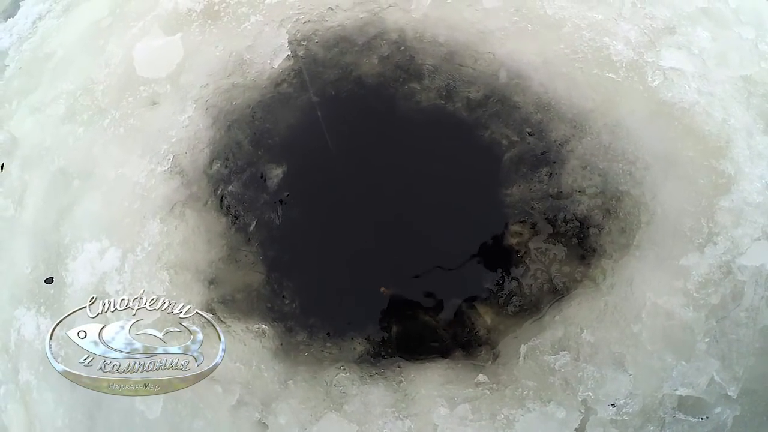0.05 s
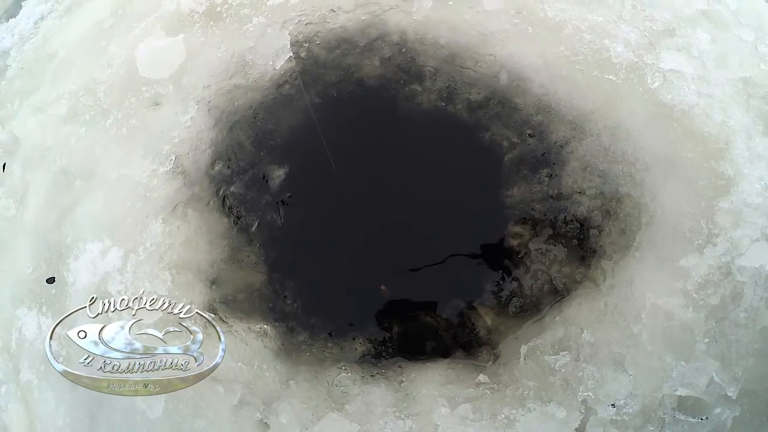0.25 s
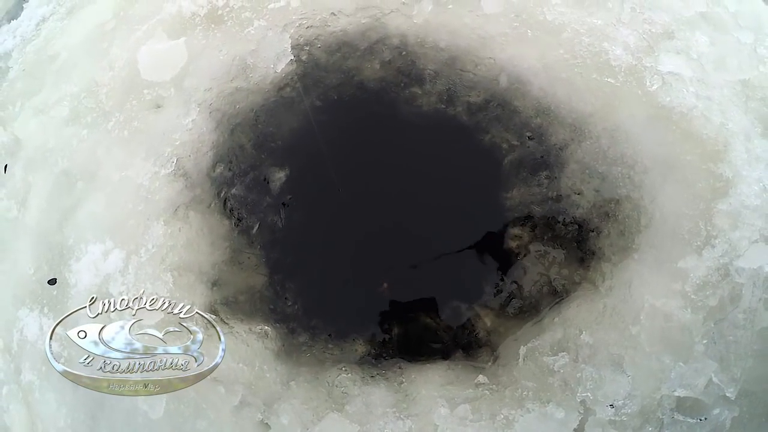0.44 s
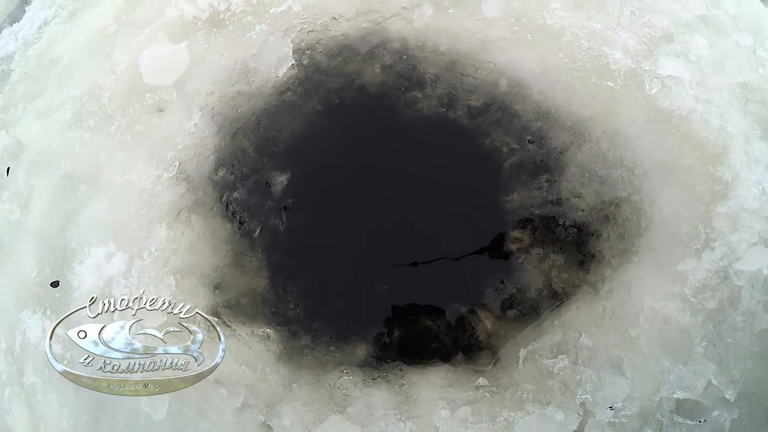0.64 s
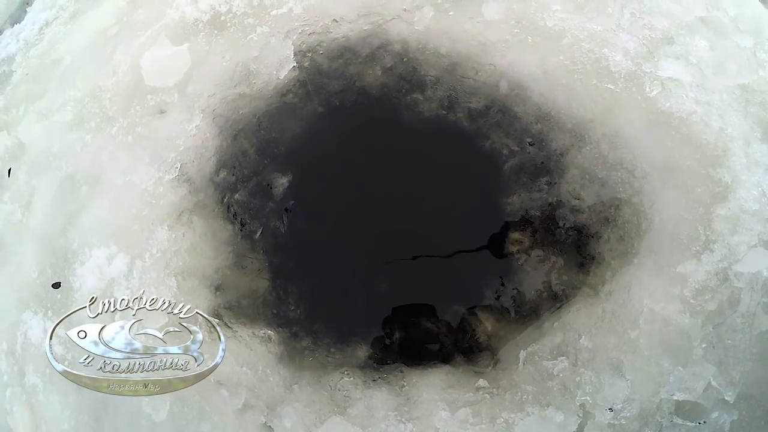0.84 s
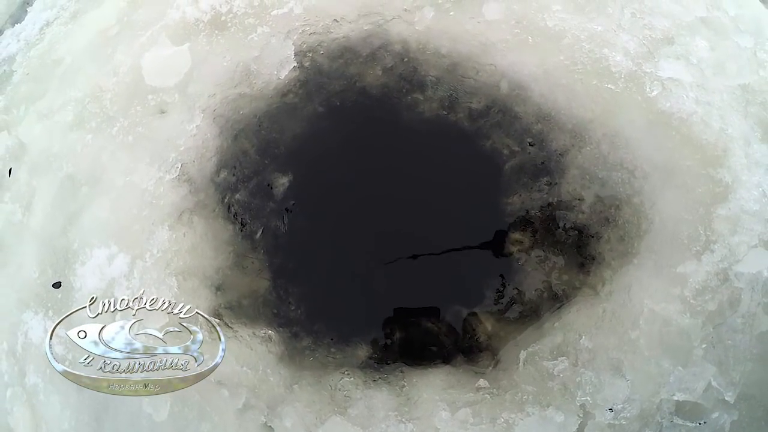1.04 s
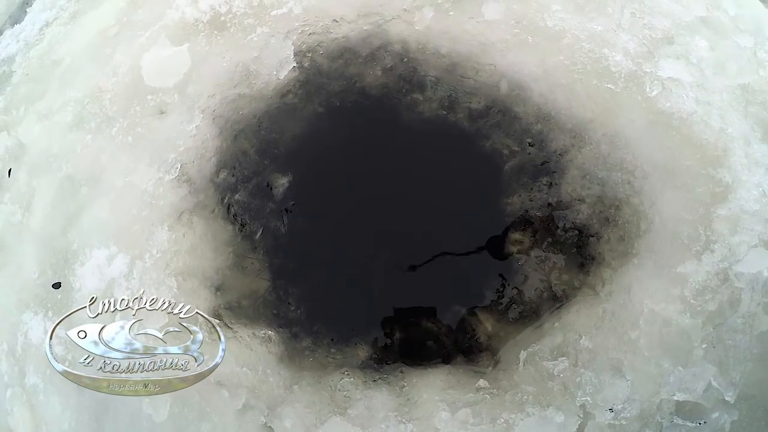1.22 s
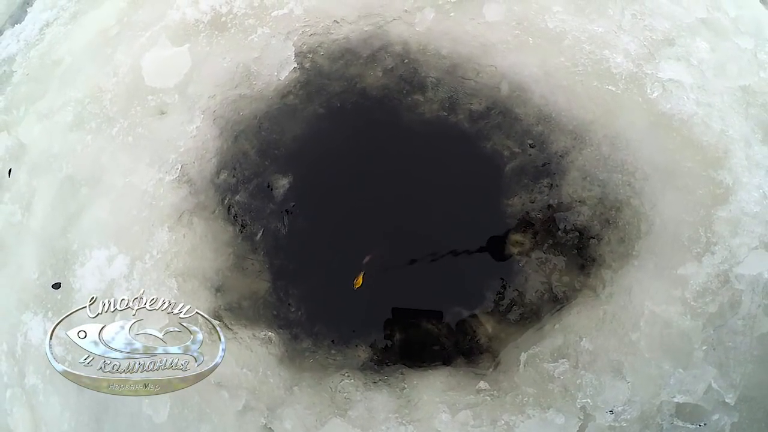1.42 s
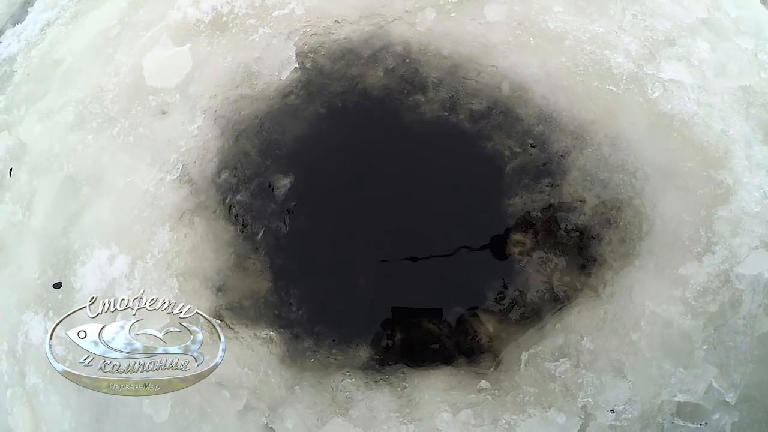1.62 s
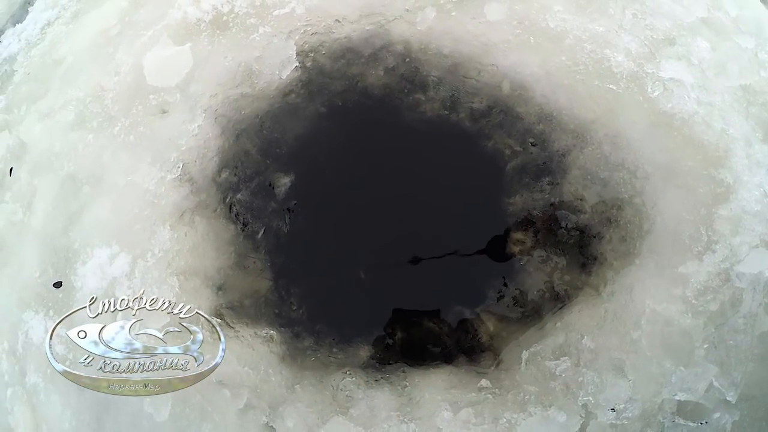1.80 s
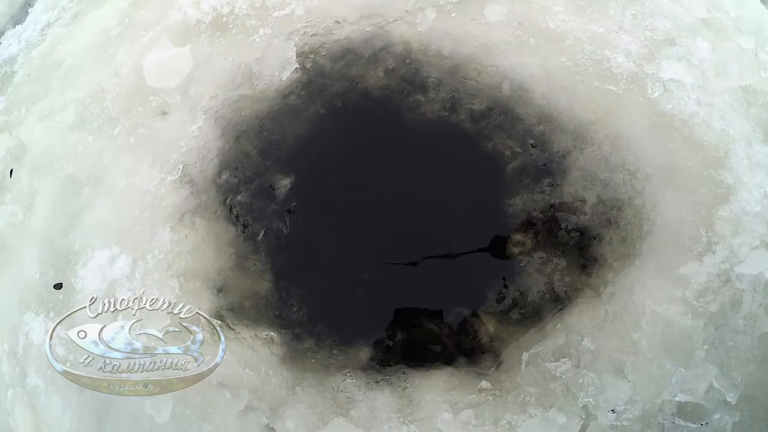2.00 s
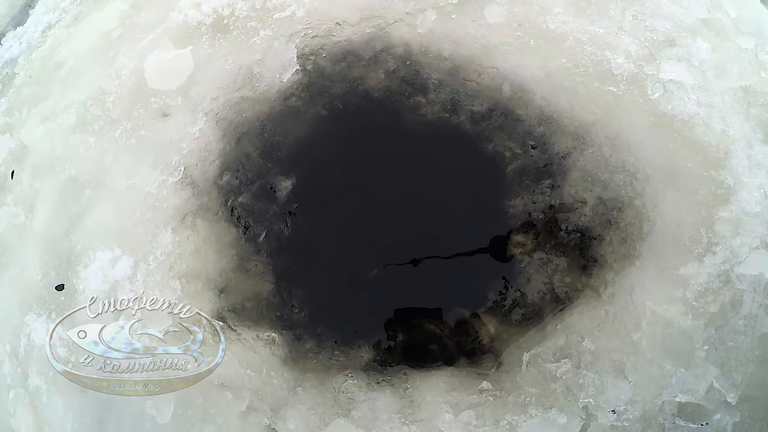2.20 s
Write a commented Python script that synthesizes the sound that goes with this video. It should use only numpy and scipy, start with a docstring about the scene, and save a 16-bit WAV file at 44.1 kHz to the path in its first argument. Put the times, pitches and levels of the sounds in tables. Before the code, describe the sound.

Dull, hollow knocks of gear handled on ice come in two bunches, each trailed by lighter bumps. Between them a small hard part clicks and rattles. Scuffing and low wind rumble run underneath, outdoors and right at the microphone.

```python
"""On the ice beside a fishing hole, gear is handled right next to a camera's microphone. Two bunches of
dull, hollow knocks, with lighter bumps after them, sound over scuffing and a low rumble of wind and
handling. Crumbs of ice crunch under the knocks. Between the bunches a small hard part clicks and
rattles, and a sleeve brushes by. Faint chirps and a whirr sit behind it all. Open air, nearly mono."""
import sys
import numpy as np
from scipy import signal
from scipy.fft import rfft, irfft, next_fast_len
from scipy.io import wavfile
from scipy.ndimage import map_coordinates

SR = 44100
rng = np.random.default_rng(int(sys.argv[2]) if len(sys.argv) > 2 else 0)


def store_pcm(level_fs):
    """Save levels as 16-bit WAV."""
    pcm = np.round(np.clip(level_fs, -1, 1) * 32767).astype(np.int16)
    wavfile.write(sys.argv[1], SR, np.atleast_2d(pcm).T)


N = 103635


def amp(db):
    """Turn decibels into a number to multiply by."""
    return 10 ** (np.asarray(db) / 20)


def unit(x):
    """Scale a sound so that its average (rms) level is 1."""
    return x / np.sqrt(np.mean(x ** 2) + 1e-20)


def gain(points, hz):
    """Read a smooth tone curve of (frequency [Hz], level [dB]) points as multipliers."""
    point_hz, db = np.transpose(points)
    return amp(np.interp(np.log(hz + 1), np.log(point_hz + 1), db))


def filtered(x, response):
    """Turn each frequency of a sound up or down by response(hz)."""
    size = next_fast_len(N + 8192)
    hz = np.fft.rfftfreq(size, 1 / SR)
    return irfft(rfft(x, size) * response(hz), size)[..., :N]


def noise(tone):
    """Noise shaped by a tone curve, at an average level of 1."""
    return unit(filtered(rng.standard_normal(N), lambda hz: gain(tone, hz)))


def wobble(rate):
    """A smooth curve through `rate` random values a second."""
    return map_coordinates(rng.standard_normal(int(N * rate / SR) + 4), [np.arange(N) * rate / SR])


def grainy_noise(tone, flicker_db, rate):
    """Noise whose level flickers, so that it sounds rough."""
    return unit(noise(tone) * amp(flicker_db * wobble(rate)))


def curve(rows):
    """Join (time [s], value) points with straight lines."""
    return np.interp(np.arange(N) / SR, *np.transpose(rows))


def swells(rows):
    """Smooth rises and falls in level from (middle [s], length [s], level [dB]) rows."""
    t = np.arange(N) / SR
    return sum(amp(db) * np.exp(-2 * ((t - s) / length) ** 2) for s, length, db in rows)


def causal(gains):
    """A filter with these gains that sounds only after it is struck (minimum phase)."""
    cepstrum = irfft(np.log(np.maximum(gains, 1e-6)))
    half = len(cepstrum) // 2
    cepstrum[1:half] *= 2
    cepstrum[half + 1:] = 0
    return np.exp(rfft(cepstrum))


def fade(t, t60):
    """Die away by 60 dB in t60 seconds, the fade time."""
    return np.exp(-np.log(1000) * t / t60)


def ring(modes, t):
    """The fading tones (modes) of a struck object; their levels vary from blow to blow."""
    return sum(amp(db + rng.normal(0, 2.5)) * fade(t, t60) * np.sin(2 * np.pi * hz * t)
               for hz, db, t60 in modes)


def add(track, s, db, sound):
    """Mix a sound in at s seconds, with its peak at db."""
    part = track[round(s * SR):][:len(sound)]
    part += amp(db) * sound[:len(part)] / np.abs(sound).max()


def air():
    """The steady hiss of open air."""
    # tone of the hiss (frequency [Hz], level [dB])
    tone = [(180, 0), (300, -7), (523, -10.5), (606, -5.5), (726, -9.5), (1130, -14), (1400, -18),
            (3070, -22), (3550, -22.5), (6400, -23.5), (15000, -24.5)]
    return noise(tone)


def lens():
    """Tiny double chirps and a thin, pulsing whirr, perhaps the lens motor."""
    # first chirp of each pair (time [s])
    chirp_times = [.086, .433, 0.912, 1.142]
    # tones in a chirp (frequency [Hz], relative level [dB])
    chirp_tones = [(3500, -11), (4030, -10), (8080, -12)]
    # when the whirr runs (start [s], end [s])
    whirr_times = [(1.90, 1.97), (2.17, 2.30)]
    # tone of the whirr (frequency [Hz], level [dB])
    whirr_tone = [(7000, -24), (8800, -12), (9700, 0), (10600, -11), (12000, -24)]
    gap_s, chirp_s, pulse_hz = 0.03, 0.0052, 72
    chirps, t = np.zeros(N), np.arange(N) / SR
    blips = sum(np.exp(-((t - s - delay) / chirp_s) ** 2) for s in chirp_times for delay in (0, gap_s))
    whine = sum(amp(db) * np.sin(2 * np.pi * hz * t + 0.5 * wobble(360)) for hz, db in chirp_tones)
    add(chirps, 0, -63, blips * whine)
    running = sum((t > start) & (t < end) for start, end in whirr_times)
    pulses = np.sin(np.pi * pulse_hz * t) ** 2
    return chirps + amp(-71) * running * pulses * noise(whirr_tone)


def rumble():
    """Wind and handling slowly push on the microphone."""
    # strength of the rumble (time [s], relative level [dB])
    levels = [(0.05, -22), (0.17, -25), (0.29, -8), (0.35, -20), (0.44, -27), (0.8, -38), (0.89, -26),
              (1.2, -50.5), (1.29, -32.5), (1.39, -31), (1.53, -18), (1.62, -24.5), (1.67, -16),
              (1.76, -32), (1.84, -32.5), (1.92, -24.5), (2.07, -27), (2.15, -44.5), (2.32, -36.5),
              (2.35, -45.5)]
    # its deep tone (frequency [Hz], level [dB])
    tone = [(12, 6), (25, -1.5), (45, -7.5), (80, -18), (130, -39), (500, -65.5), (1500, -93)]
    level_db = curve(levels) + 2 + 4.5 * wobble(11.01)
    return amp(level_db) * noise(tone)


def sleeve():
    """Cloth brushes by in soft, grainy strokes."""
    # sleeve strokes (middle [s], length [s], level [dB])
    strokes = [(1.027, 0.12, -67), (1.174, 0.066, -67.5), (1.245, 0.013, -66), (1.535, 0.087, -70.5),
               (1.654, 0.027, -59), (1.702, 0.039, -67.5), (1.93, 0.061, -78), (2.011, 0.037, -72),
               (2.1, 0.045, -74), (2.27, 0.15, -78)]
    # tone of rubbing cloth (frequency [Hz], level [dB])
    tone = [(500, -17.5), (2500, -9), (5900, -7), (6550, -1), (7400, -2.5), (10000, -6), (12500, -11),
            (15000, -10.5)]
    return swells(strokes) * grainy_noise(tone, flicker_db=1.5, rate=410)


def scuff():
    """Gear shifts and rubs as it is handled, low and uneven."""
    # strength of the rubbing (time [s], level [dB])
    levels = [(0, -67), (.11, -49.5), (.17, -55.5), (.27, -37), (.33, -43), (.39, -48.5), (.44, -58),
              (.58, -51), (.67, -60.5), (.73, -51.5), (.80, -70), (.91, -49), (1.10, -74.5), (1.22, -74),
              (1.3, -61), (1.48, -53.5), (1.52, -34), (1.57, -36), (1.605, -47), (1.69, -49), (1.76, -63.5),
              (1.86, -55.5), (1.94, -50), (2.13, -82), (2.23, -58.5)]
    # its low tone (frequency [Hz], level [dB])
    tone = [(50, -2), (130, 2), (250, -12), (520, -20), (800, -29.5), (1500, -40.5), (5000, -78)]
    return amp(curve(levels)) * grainy_noise(tone, flicker_db=2.8, rate=90)


def grit():
    """Crumbs of ice crunch briefly under the knocks."""
    # crunches (middle [s], length [s], level [dB])
    crunches = [(.28, 0.075, -62.5), (1.535, 0.071, -62.5), (1.665, 0.024, -67), (1.935, 0.026, -75)]
    # tone of the crumbs (frequency [Hz], level [dB])
    tone = [(200, -5.5), (550, -1.5), (1200, 4), (1900, -10.5), (2400, -4.5), (4000, -9), (12000, -38)]
    return swells(crunches) * grainy_noise(tone, flicker_db=6.5, rate=400)


def taps(hits, modes, burst_fade_s):
    """Each tap on a small hard part makes a burst of bright noise and sets the part ringing."""
    out, t = np.zeros(N), np.arange(SR // 8) / SR
    treble_only = signal.butter(2, 2000, "hp", fs=SR, output="sos")
    attack = 1 - np.exp(-t / 0.00025)
    for s, db in hits:
        burst = signal.sosfilt(treble_only, rng.standard_normal(len(t))) * fade(t, burst_fade_s)
        add(out, s, db, (ring(modes, t) + amp(-1) * burst) * attack)
    return out


def clicks():
    """The small hard part makes sharp contacts that die away at once."""
    # clicks (time [s], peak level [dB])
    hits = [(.8875, -52), (1.266, -45), (1.3875, -43), (1.410, -30), (1.4625, -60), (1.621, -50.5),
            (2.323, -53.5)]
    # the part's ringing tones (frequency [Hz], level [dB], fade time [s])
    modes = [(3400, -9.5, 0.011), (4129, -4, 0.019), (6420, -2, 0.015), (6800, 1.5, 0.015),
             (11080, -0.5, 0.0067), (13700, -7, 0.009)]
    return taps(hits, modes, burst_fade_s=0.016)


def rattle():
    """Looser contacts come close together and ring for longer."""
    # loose contacts (time [s], peak level [dB])
    hits = [(1.2724, -39.5), (1.2775, -51), (1.286, -48.5)]
    # their ringing tones (frequency [Hz], level [dB], fade time [s])
    modes = [(2300, 3, 0.025), (2650, -11.5, 0.088), (3670, -0.5, 0.03), (4124, -7, 0.04),
             (6600, -2, 0.035), (7050, -5, .045), (9560, -15, 0.021)]
    return taps(hits, modes, burst_fade_s=0.079)


def crackles():
    """Brief overload-like crackles on the hardest knocks, each with a short rough tail."""
    # crackles (time [s], peak level [dB])
    hits = [(0.2513, -52), (0.2552, -46.5), (0.2615, -38), (0.2638, -23.5), (0.2662, -39), (0.268, -29.5),
            (0.2696, -40), (0.2947, -49), (1.511, -54), (1.529, -48.5)]
    # tone of a crackle (frequency [Hz], level [dB])
    tone = [(100, -13), (700, 31.5), (1400, 17), (3000, 2.5), (6000, -11), (14000, -21.5)]
    out, t = np.zeros(N), np.arange(1024) / SR
    colour = causal(gain(tone, np.fft.rfftfreq(len(t), 1 / SR)))
    for s, db in hits:
        rough_tail = rng.standard_normal(len(t)) * fade(t, t60=0.0039)
        pulse = 1 + rfft(rough_tail / np.linalg.norm(rough_tail))
        add(out, s, db, irfft(colour * pulse))
    return out


def knocks():
    """Each knock of the gear is one push with a short shudder and a hollow ring; soft ones are duller."""
    # knocks (time [s], peak level [dB], frequency above which the knock is dulled [Hz])
    hits = [(0.122, -26, 130), (0.196, -20, 240), (0.242, -16, 340), (0.2515, -4, 231),
            (0.2548, -14.5, 800), (0.2625, -5.5, 580), (0.269, -12.5, 482), (0.282, -8.5, 79.4),
            (0.2952, -14, 600), (.307, -11.5, 180), (.347, -22, 704), (0.358, -21, 202), (0.37, -23, 248),
            (0.481, -25, 151), (0.514, -21, 256), (0.59, -23.5, 180), (0.611, -25, 154), (0.851, -28, 76),
            (0.888, -20.5, 86), (0.925, -26.5, 70), (1.493, -13, 146), (1.503, -10.5, 101),
            (1.5084, -15.5, 970), (1.521, -11.5, 355), (1.5262, -17, 730), (1.529, -8, 910),
            (1.533, -17, 525), (1.541, -8.5, 291), (1.548, -16, 414), (1.560, -15.5, 313),
            (1.567, -17.5, 670), (1.577, -17, 377), (1.583, -13.5, 119), (1.633, -24, 265),
            (1.667, -24.5, 175), (1.912, -21, 233), (1.922, -15.5, 91), (1.942, -22, 390),
            (1.954, -28, 416), (1.99, -27.5, 101), (2.034, -21.5, 226)]
    # tone of the body that the knocks sound through (frequency [Hz], level [dB])
    body_tone = [(20, -2.5), (40, 1), (80, 3), (160, 1), (250, -3), (500, -12.5), (1000, -16.5),
                 (2000, -26), (5000, -31.5), (14000, -35.5)]
    # its ringing tones (frequency [Hz], level [dB], fade time [s])
    body_modes = [(137.5, -11.5, 0.16), (258, -2.5, 0.029), (372, -8.5, 0.045), (472, -14, 0.021),
                  (569, -15.5, 0.072), (764, -6, 0.013)]
    shudder_db, shudder_hz, ring_db, damping = -3, 480, -10, 1.62
    out, t = np.zeros(N), np.arange(SR // 2) / SR
    hz = np.fft.rfftfreq(len(t), 1 / SR)
    body = causal(gain(body_tone, hz))
    for s, db, corner_hz in hits:
        shudder = rng.standard_normal(len(t)) * fade(t, t60=0.041)
        dull_shudder = rfft(shudder / np.linalg.norm(shudder)) / (1 + 1j * hz / shudder_hz)
        force = 1 + amp(shudder_db) * dull_shudder  # the 1 is the single clean push
        thud = irfft(force * body)
        blow = thud / np.abs(thud).max() + amp(ring_db) * ring(body_modes, t)
        ratio = 1j * hz / corner_hz
        treble_cut = (1 + damping * ratio + ratio ** 2) ** 2
        add(out, s, db, irfft(rfft(blow) / treble_cut))
    return out


def scene():
    """Mix left and right: everything sits near the middle, with the small sounds slightly to the left."""
    small = clicks() + rattle() + crackles() + grit() + sleeve() + lens()
    middle = knocks() + rumble() + scuff() + small + amp(-67) * air()
    # a faint side signal, added on the left and taken away on the right, so the two sides differ very slightly
    side = amp(-83.5) * air() + amp(-30.5) * small
    side += amp(-41.5) * (knocks() + rumble() + scuff())
    return np.array([middle + side, middle - side])


def record(dry):
    """The microphone overloads on any peak past full scale and loses the highest treble."""
    # the microphone's tone (frequency [Hz], level [dB])
    tone = [(11000, 1.5), (13500, -4.5), (15000, -15.5)]
    top_hz = 15600
    clipped = np.clip(dry, -1, 1)
    return filtered(clipped, lambda hz: gain(tone, hz) * (hz < top_hz))


dry = scene()
out = record(dry)
store_pcm(out)
```